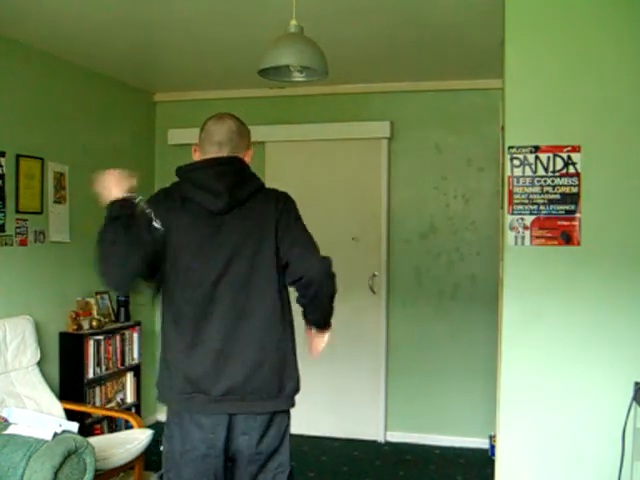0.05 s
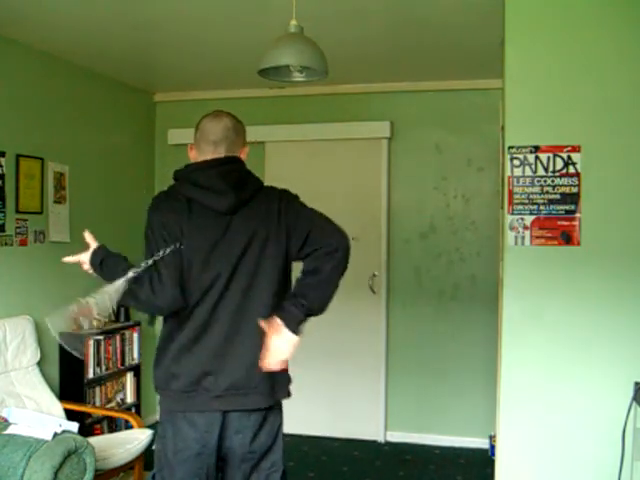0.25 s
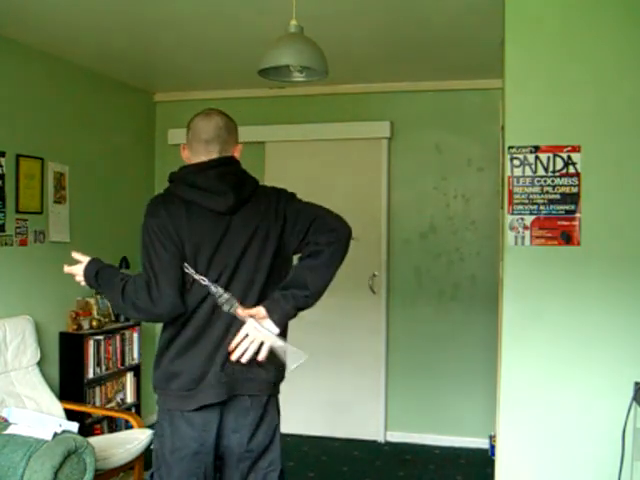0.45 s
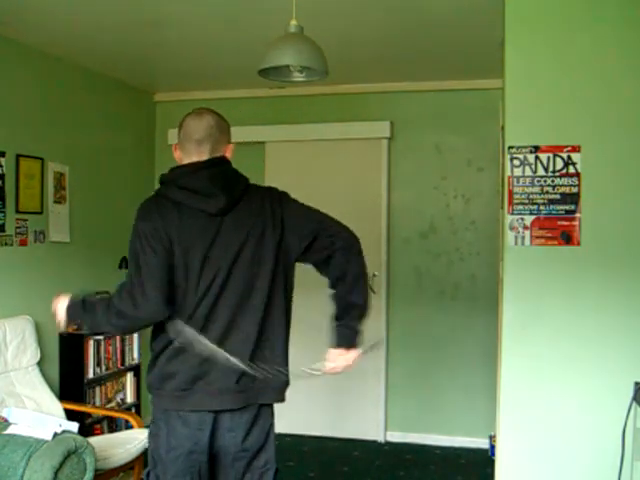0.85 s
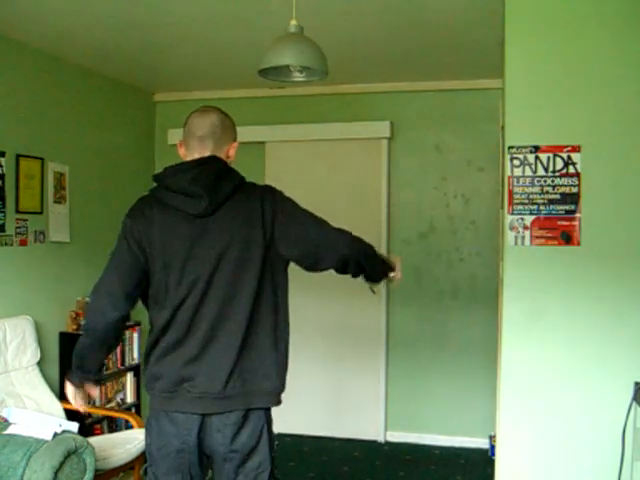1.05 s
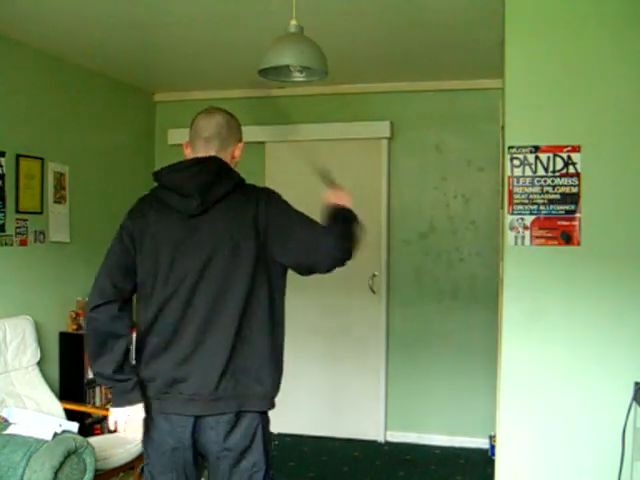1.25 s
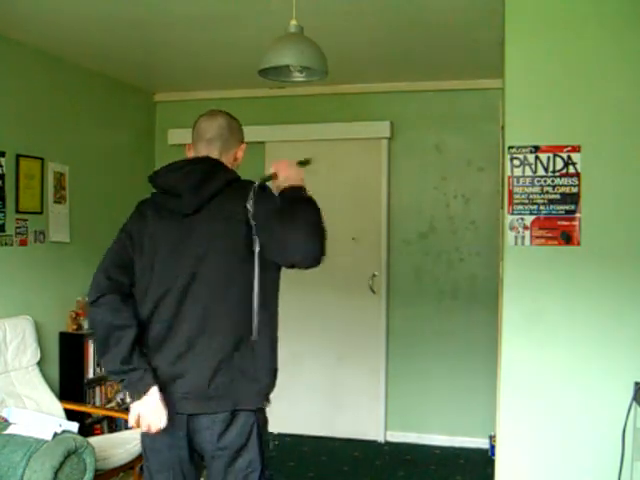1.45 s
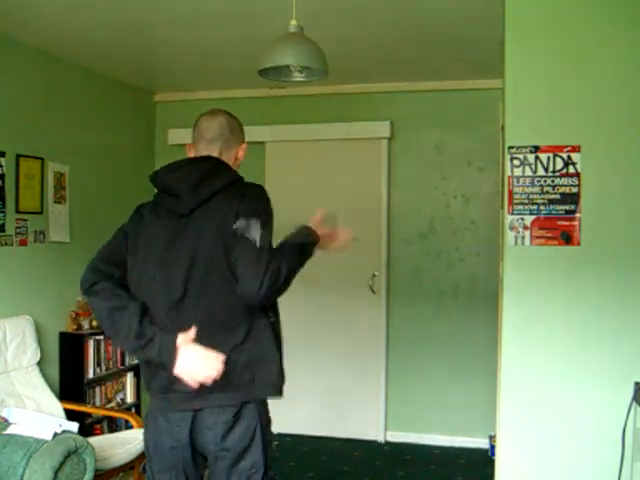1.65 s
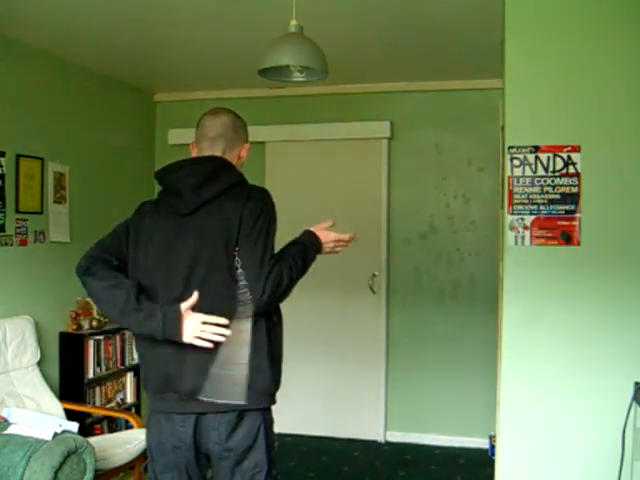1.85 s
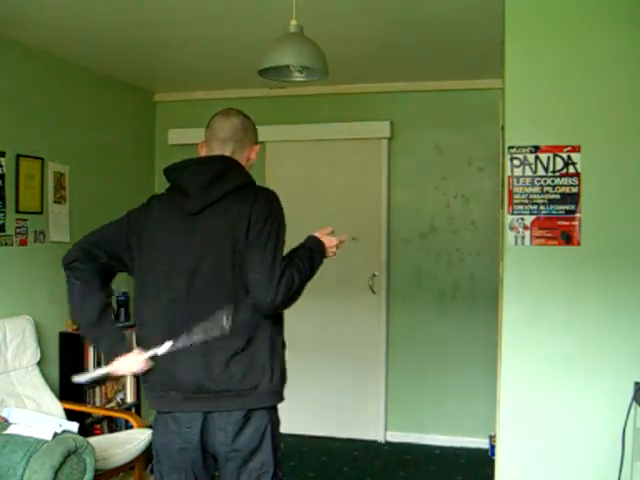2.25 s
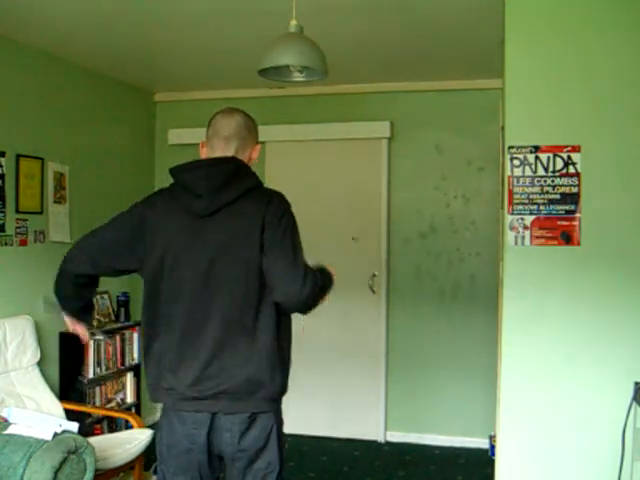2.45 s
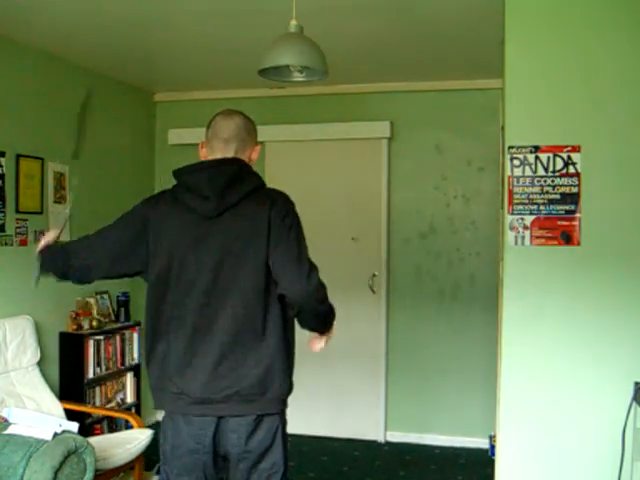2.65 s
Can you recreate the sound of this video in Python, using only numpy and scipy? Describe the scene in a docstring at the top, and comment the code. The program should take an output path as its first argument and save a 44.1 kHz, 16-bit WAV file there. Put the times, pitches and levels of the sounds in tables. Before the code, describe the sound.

The chain of swinging nunchaku rattles in quick, uneven bursts, clacking sharply as it snaps tight and pinging lightly. A sweatshirt rustles softly underneath. The small, quiet room adds a short echo and faint hiss.

```python
"""First a sweatshirt rustles and a chain rattles: nunchaku are swung in a small, quiet room.
The chain clacks sharply as it snaps tight, rattles as its slack links tumble, and pings
when links ring freely. The cloth takes the sticks with soft pats and feet thud on the floor.
Close walls add a short echo, and a faint hiss, hum and high whine lie underneath."""
import sys
import numpy as np
from scipy import signal
from scipy.fft import rfft, irfft, next_fast_len
from scipy.io import wavfile
from scipy.ndimage import uniform_filter1d

SR = 44100
rng = np.random.default_rng(int(sys.argv[2]) if len(sys.argv) > 2 else 0)


def wrap_up_sound(samples):
    """Save the sound to the file named by the first command line argument, as 16-bit audio."""
    columns = np.atleast_2d(samples).T
    # keep every value between -1 and 1, then stretch to whole-number steps
    tamed = np.clip(columns, -1, 1)
    steps = np.round(tamed * 32767).astype(np.int16)
    wavfile.write(sys.argv[1], SR, steps)


N = 119070
T = np.arange(N) / SR

# the chain snaps tight:
# (time [s], relative level [dB], ring pitch [Hz], ring level [dB], gain below 4500 Hz [dB])
CHAIN_SNAPS = [(0.4622, -26.5, 4450, -4, -6), (0.4655, -10.5, 4240, -5.5, -10.5),
               (0.4680, -14.5, 11340, -0.5, -1.5), (0.4738, -13, 11100, -12, -5.5),
               (0.4844, -21.5, 4350, -12, -1), (1.4472, -27, 4340, -5, -3.5), (1.472, -34.5, 3130, 7.5, 9),
               (1.534, -29.5, 4350, -2, 7), (1.7133, -12, 14800, -3, -5), (1.9385, -9.5, 7070, -7.5, -5),
               (1.9590, -25, 6860, -8, 6)]
# tone of the snaps: (frequency [Hz], gain [dB])
SNAP_TONE = [(200, -8.5), (1400, 3.5), (2000, 1), (3000, 4.5), (9000, 6), (16000, -0.5)]
# free links ring: (time [s], relative level [dB], pitch [Hz], time to fade by 60 dB [s])
LINK_PINGS = [(0.5002, -37, 4240, 0.028), (0.7258, -26.5, 10960, 0.024), (0.8537, -32, 4250, 0.011),
              (1.0690, -26, 11310, 0.045), (1.0850, -23, 11400, 0.021), (1.4703, -20, 8690, 0.008),
              (1.517, -37, 4300, 0.012), (1.5492, -29, 5000, 0.0069), (1.672, -30, 12000, 0.026),
              (1.668, -35, 14850, .08), (1.6960, -24, 14850, 0.054), (1.6990, -31, 12000, 0.033),
              (1.713, -15, 14950, 0.028), (1.714, -24, 12150, 0.023), (1.715, -33, 4220, .017),
              (1.813, -33, 4490, 0.051), (1.9390, -18, 4690, 0.0048), (1.9392, -22.5, 8820, .012),
              (1.943, -24, 4090, 0.021), (2.4030, -26.5, 8300, 0.042), (2.404, -37, 4400, 0.014),
              (2.432, -37.5, 4230, 0.016)]
# links tumble: (time [s], relative level [dB], rise [s], fall [s], treble gain [dB])
LINK_RATTLES = [(0.0409, -30.5, 0.00092, 0.012, -17), (0.0611, -24.5, 0.00091, 0.008, -9),
                (0.096, -21, 0.0073, 0.024, -1.5), (0.222, -28.5, 0.011, 0.023, 4.5),
                (0.2570, -26, 0.0044, 0.012, 9), (0.298, -26, 0.0031, 0.0061, -1),
                (0.393, -30, 0.0072, 0.024, 5.5), (0.8547, -28, 0.0036, 0.01, -13),
                (0.9449, -25.5, .004, 0.009, -6), (0.983, -30, 0.0011, .012, -10),
                (1.0070, -27.5, 0.003, 0.017, -5), (1.069, -26.5, .005, 0.017, 6),
                (1.2750, -32.5, 0.00084, 0.018, 11.5), (1.472, -20.5, .0006, 0.025, -6),
                (1.5328, -25, 0.0035, 0.02, -13), (1.6070, -32.5, 0.0037, 0.013, 9),
                (1.697, -26.5, 0.022, 0.026, 11), (1.718, -26.5, 0.0015, 0.023, 17.5),
                (1.8108, -16.5, 0.0078, 0.0097, 1.5), (1.8310, -22, 0.0046, 0.025, 2),
                (2.056, -30, 0.0033, 0.0033, 1), (2.2730, -27, 0.0084, 0.0024, 3.5),
                (2.2920, -29, 0.0035, 0.026, -10), (2.369, -20, 0.013, 0.008, 3),
                (2.4035, -18.5, 0.001, .014, 1.5), (2.4240, -25, 0.0029, 0.02, -11),
                (2.499, -31.5, .002, 0.029, -14), (2.608, -36, 0.014, 0.021, -7)]
# tone of the rattles: (frequency [Hz], gain [dB])
RATTLE_TONE = [(200, -11), (1300, 2.5), (1900, -0.5), (3000, 1.5), (4800, 5), (6200, 3.5), (8400, 8),
               (10000, 4), (16000, -2.5)]
# cloth strokes and pats: (time [s], level [dB], fall [s], centre frequency [Hz])
CLOTH_STROKES = [(0.005, -43.5, 0.026, 477), (0.027, -44, 0.018, 148), (0.404, -43, 0.014, 647),
                 (1.480, -45.5, 0.037, 197), (1.505, -53, 0.054, 700), (1.785, -44.5, 0.013, 950),
                 (1.815, -44.5, 0.018, 1340), (1.975, -51, 0.057, 544), (2.279, -53, 0.05, 1330),
                 (2.390, -55, 0.13, 477)]
# weight shifts on the floor: (time [s], peak level [dB], spread in time [s])
FOOT_THUDS = [(1.087, -58, 0.067), (1.506, -50.5, 0.041)]
# sound bouncing off near walls: (delay [s], level [dB])
WALL_ECHOES = [(.0032, -8), (.0098, -12), (.0200, -13.5)]
# how long the room rings: (frequency [Hz], time to fade by 60 dB [s])
ROOM_FADE = [(150, 0.41), (4000, 0.36), (9000, 0.28), (15000, 0.22)]
# peaks and dips of the microphone housing: (frequency [Hz], gain [dB], narrowness [Q])
MIC_RESONANCES = [(4320, 7, 5.8), (6490, -9, 34), (7600, -8.5, 24), (7730, 3.5, 11.3), (1439, 7, 11.6)]
# tone of the room's rumble and hiss: (frequency [Hz], gain [dB])
HISS_TONE = [(15, -19), (25, -2), (166, -3), (370, -8.5), (8140, -18.5), (16000, -20)]
# steady low hum: (pitch [Hz], level [dB])
HUM_NOTES = [(64, -68.5), (122, -64.5)]


def clacks(gain_db=16.3, spread_s=0.0024, build_s=0.00044):
    """The chain snaps tight: its links slam together in quick succession and one of them rings."""
    out = np.zeros(N)
    for s, db, ring_hz, ring_db, body_db in CHAIN_SNAPS:
        contacts = colour(even_crack(spread_s), [(4500, body_db), (8000, 0)])
        link = from_db(ring_db) * unit(ring(ring_hz, fade_s=0.0071))
        build = 1 - np.exp(-T[:len(contacts)] / build_s)  # links take the strain one by one
        add(out, s, from_db(db + gain_db) * build * (contacts + link) / 2)
    return colour(out, SNAP_TONE)


def even_crack(decay_s, size=6000):
    """Many contacts at once: a short burst about equally strong at every frequency."""
    fade = np.exp(-T[:size] / decay_s)
    spectrum = rfft(crack(decay_s, size=size), 2 * size)
    evened = irfft(spectrum / (np.abs(spectrum) + 1e-12))[:size]
    return unit(evened * fade ** 0.1)


def rattles(gain_db=10, touches_per_s=600, spread_db=14.5, lead_s=0.06):
    """Slack links tumble: each run of touches builds up to its firmest one and then thins out."""
    out = np.zeros(N)
    steps = np.arange(-14, 56)
    varied = steps != 0  # the firmest touch keeps its exact time and strength
    for s, db, rise_s, fall_s, treble_db in LINK_RATTLES:
        run = np.zeros(12000)
        delays = (steps + (rng.random(len(steps)) - 0.5) * varied) / touches_per_s
        strengths = from_db(-spread_db * rng.random(len(steps)) * varied)
        strengths *= swell(delays, rise_s, fall_s)
        for delay, strength in zip(delays, strengths):
            add(run, lead_s + delay, strength * touch())
        # light, bright touches barely stir the links' lowest ring, at 4350 Hz
        tone = [(3200, 0), (4350, -0.39 * treble_db), (5500, 0), (8500, 0), (11500, treble_db)]
        add(out, s - lead_s, from_db(db + gain_db) * colour(unit(run), tone))
    return colour(out, RATTLE_TONE)


def touch(low_hz=3570, high_hz=9340, ring_db=-7.5, size=1200):
    """One link meets another: a tick and a short ring at a random pitch."""
    hz = low_hz * (high_hz / low_hz) ** rng.random()
    tick = crack(decay_s=0.0011, size=size)
    return tick + from_db(ring_db) * unit(ring(hz, fade_s=0.012, size=size))


def pings(count=4, spread_hz=134, attack_s=0.00047):
    """A few free links ring together, each at a slightly different pitch."""
    out = np.zeros(N)
    for s, db, hz, fade_s in LINK_PINGS:
        offsets_hz = spread_hz * (np.linspace(-1, 1, count) + rng.uniform(-0.56, 0.39, count))
        links = [ring(hz + offset, fade_s) * rng.choice([-1, 1]) for offset in offsets_hz]
        attack = 1 - np.exp(-T[:len(links[0])] / attack_s)
        one_link_strength = np.linalg.norm(links[0])
        add(out, s, from_db(db) * one_link_strength * unit(sum(links) * attack))
    return out


def cloth(grain_db=4.5, band_ratio=1.8):
    """Rubbing cloth makes a grainy noise that swells and dies with each arm movement."""
    out = np.zeros(N)
    for s, db, fall_s, hz in CLOTH_STROKES:
        grain = from_db(grain_db * rms_one(uniform_filter1d(rng.standard_normal(N), 150)))
        rubbing = band(rng.standard_normal(N) * grain, hz / band_ratio, hz * band_ratio)
        out += from_db(db) * swell(T - s, 0.57 * fall_s, fall_s) * rms_one(rubbing)
    return out


def thuds(pitch_hz=68.4):
    """The floor booms softly under the feet."""
    loudness = sum(from_db(db) * np.exp(-((T - s) / spread_s) ** 2 / 2)
                   for s, db, spread_s in FOOT_THUDS)
    return loudness * np.sqrt(2) * np.sin(2 * np.pi * pitch_hz * T)


def moving_in_room(x, places=5, moves_per_s=14):
    """Each place along the swing has echoes of its own."""
    place = np.floor(T * moves_per_s) % places
    return sum(room(x * uniform_filter1d((place == k) * 1., size=200)) for k in range(places))


def room(x, tail_db=-2, build_s=0.0025, size=24000):
    """The sound arrives directly, off three near walls, and as a wash whose treble dies first."""
    t, edges_hz = T[:size], np.geomspace(60, 20000, 11)
    noise = rng.standard_normal((2, size))
    tail = np.zeros(size)
    for k, (low, high) in enumerate(zip(edges_hz, edges_hz[1:])):
        fade_s = at_hz(ROOM_FADE, np.sqrt(low * high))
        tail += band(noise[k % 2], low, high) * from_db(-60 * t / fade_s)
    response = from_db(tail_db) * unit(tail * (1 - np.exp(-t / build_s)))
    response[0] += 1  # the direct sound
    for delay_s, db in WALL_ECHOES:
        add(response, delay_s, from_db(db) * crack(decay_s=0.00077))
    return signal.fftconvolve(x, response)[:N]


def microphone(x):
    """A small microphone housing boosts three narrow ranges of pitch and weakens two."""
    for hz, db, q in MIC_RESONANCES:
        gain, angle = from_db(db / 2), 2 * np.pi * hz / SR
        width, middle = np.sin(angle) / (2 * q), -2 * np.cos(angle)
        x = signal.lfilter([1 + width * gain, middle, 1 - width * gain],
                           [1 + width / gain, middle, 1 - width / gain], x)
    return x


def background(hiss_db=-51, whine_db=-66):
    """Room rumble and hiss, a low hum and a thin electrical whine."""
    hiss = from_db(hiss_db) * rms_one(colour(rng.standard_normal(N), HISS_TONE))
    hum = sum(from_db(db) * np.sqrt(2) * np.sin(2 * np.pi * (hz * T + rng.random()))
              for hz, db in HUM_NOTES)
    whine = from_db(whine_db) * rms_one(band(rng.standard_normal(N), low_hz=14990, high_hz=15100))
    return hiss + hum + whine


def ring(hz, fade_s, size=6000):
    """A pure tone that dies away by 60 dB in fade_s."""
    return np.sin(2 * np.pi * hz * T[:size]) * from_db(-60 * T[:size] / fade_s)


def crack(decay_s, size=6000):
    """A hard contact: a very short burst of noise."""
    return unit(rng.standard_normal(size) * np.exp(-T[:size] / decay_s))


def swell(t, rise_s, fall_s):
    """A loudness curve that grows to one at t = 0 and then dies away."""
    return np.exp(-np.maximum(-t / rise_s, t / fall_s))


def from_db(db):
    """Turn decibels into a multiplier."""
    return 10 ** (np.asarray(db) / 20)


def unit(x):
    """Scale to a total energy of one."""
    return x / np.sqrt(np.sum(x ** 2) + 1e-20)


def rms_one(x):
    """Scale to an average power of one."""
    return unit(x) * np.sqrt(len(x))


def at_hz(points, hz):
    """Read between the rows of a table, with octaves evenly spaced."""
    frequencies, values = np.transpose(points)
    return np.interp(np.log(hz + 1e-3), np.log(frequencies), values)


def colour(x, points):
    """Shape the tone to follow (frequency [Hz], gain [dB]) points."""
    size = next_fast_len(len(x)) * 2
    gains = from_db(at_hz(points, np.arange(size // 2 + 1) * SR / size))
    cepstrum = irfft(np.log(gains))
    # fold onto the first half, so nothing sounds before the hit that causes it
    cepstrum[1:size // 2] *= 2
    cepstrum[size // 2 + 1:] = 0
    return irfft(rfft(x, size) * np.exp(rfft(cepstrum)))[:len(x)]


def band(x, low_hz, high_hz):
    """Keep the sound between two frequencies."""
    edges_hz = [low_hz, min(high_hz, SR / 2 - 500)]
    return signal.sosfilt(signal.butter(2, edges_hz, "band", fs=SR, output="sos"), x)


def add(out, s, sound):
    """Mix a sound in at s seconds, dropping whatever does not fit."""
    start = int(s * SR)
    sound, start = sound[max(-start, 0):], max(start, 0)
    out[start:start + len(sound)] += sound[:max(len(out) - start, 0)]


def scene():
    """Chain and cloth echo in the room, over the thuds and the background."""
    swinging = clacks() + pings() + rattles() + cloth()
    return (microphone(moving_in_room(swinging)) + thuds() + background())[None]


def record(dry):
    """The very highest treble is cut off steeply."""
    cutoff_hz = 15850
    return signal.sosfilt(signal.ellip(12, 0.2, 70, cutoff_hz, fs=SR, output="sos"), dry)


dry = scene()
out = record(dry)
wrap_up_sound(out)
```